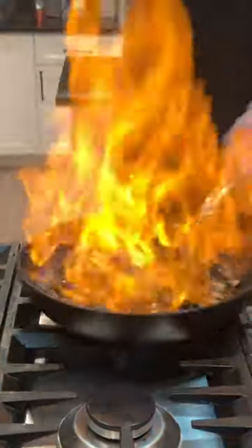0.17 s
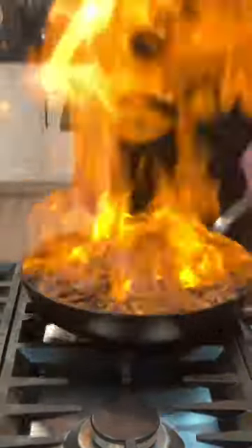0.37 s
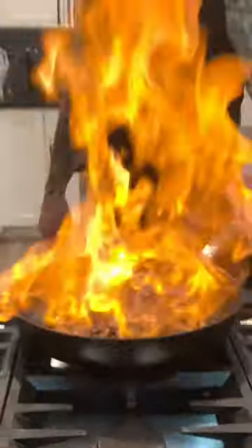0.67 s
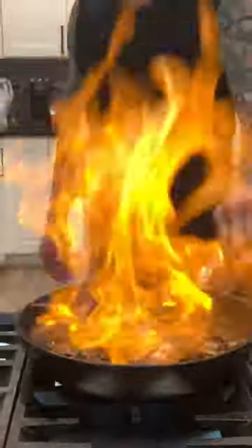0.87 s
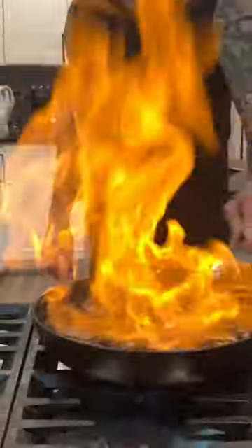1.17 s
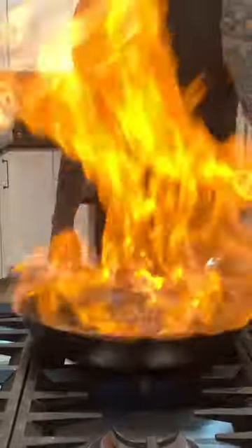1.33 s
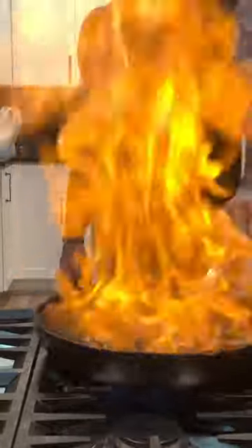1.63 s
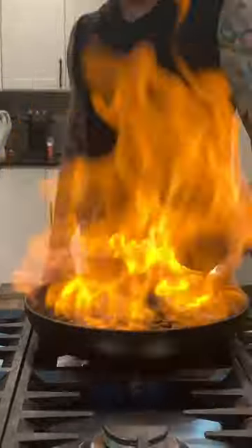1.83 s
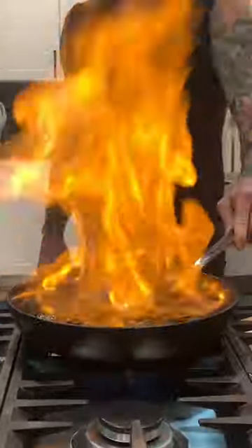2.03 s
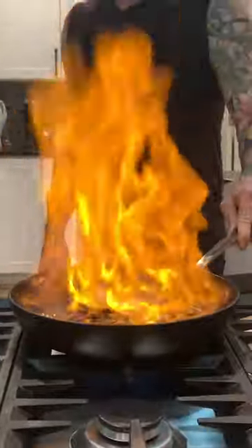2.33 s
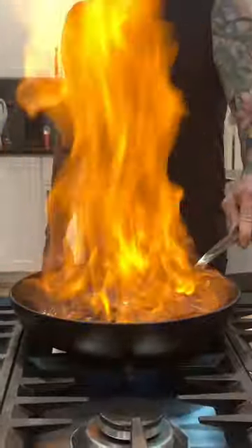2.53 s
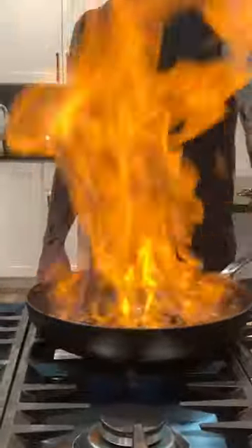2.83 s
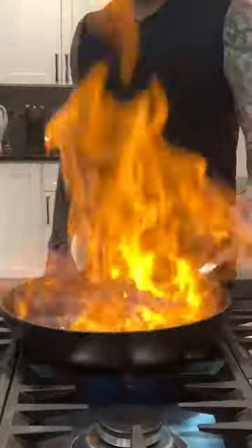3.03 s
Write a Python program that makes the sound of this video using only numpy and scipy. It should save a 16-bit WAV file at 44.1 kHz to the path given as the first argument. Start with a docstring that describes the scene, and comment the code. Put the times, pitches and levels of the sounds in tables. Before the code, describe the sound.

Fat hissing and spitting in a shaken pan, with metal knocks and a soft flame roar.

```python
"""Fat hisses, fizzes and spits in a steel pan, over the soft roar of gas flames and an appliance's hum.
Bursting bubbles are brief damped oscillations; steam and flame are broadband noise. The shaken pan
drags, knocks and scrapes on the iron grate: friction and impact excite the same normal modes, and its
weight sets the stove top booming. The sound is close, with a short diffuse tail that gives it width."""
import sys
import numpy as np
from scipy import signal
from scipy.fft import rfft, irfft, next_fast_len
from scipy.io import wavfile
from scipy.ndimage import uniform_filter1d, map_coordinates

SR = 44100
rng = np.random.default_rng(int(sys.argv[2]) if len(sys.argv) > 2 else 0)


def log_audio(samples):
    """Write samples as a 16-bit WAV file to the path given in sys.argv[1]."""
    # one column per channel
    frames = np.atleast_2d(samples).T
    # limit to full scale, then quantise
    limited = np.clip(frames, -1, 1)
    pcm = np.round(limited * 32767).astype(np.int16)
    wavfile.write(sys.argv[1], SR, pcm)


N = 141120


def amp(db):
    """Decibels to amplitude ratio."""
    return 10 ** (np.asarray(db) / 20)

def unit(x):
    """Normalisation to rms 1."""
    return x / np.sqrt(np.mean(x ** 2) + 1e-20)

def along(points, hz):
    """Interpolation of (Hz, value) points on a log frequency axis."""
    f, v = np.transpose(points)
    return np.interp(np.log(hz + 1), np.log(f + 1), v)

def curve(rows):
    """Linear interpolation of (seconds, value) rows at every sample."""
    s, v = np.transpose(rows)
    return np.interp(np.arange(N) / SR, s, v)

def wobble(rate):
    """Random modulation: a spline through `rate` knots a second."""
    knots = rng.standard_normal(int(N / SR * 100) + 4)
    return map_coordinates(knots, [np.arange(N) * min(rate, 100) / SR])

def filtered(x, response):
    """Linear filtering: the spectrum times a complex frequency response."""
    m = next_fast_len(x.shape[-1] + 8192)
    return irfft(rfft(x, m) * response(np.fft.rfftfreq(m, 1 / SR)), m)[..., :x.shape[-1]]

def treble(x, corner_hz=3300):
    """A gentle second-order high-pass."""
    return filtered(x, lambda hz: (1j * hz / (corner_hz + 1j * hz)) ** 2)

def rush(spectrum, patchy_db):
    """Coloured noise of rms 1, modulated in random patches of time and frequency."""
    cells = signal.stft(rng.standard_normal(N), nperseg=512)[2]
    patches = uniform_filter1d(rng.standard_normal(cells.shape), size=8, axis=0)
    patches = uniform_filter1d(patches, size=6, axis=1)
    noise = signal.istft(cells * amp(patchy_db * unit(patches)), nperseg=512)[1][:N]
    return unit(filtered(noise, lambda hz: amp(along(spectrum, hz))))

def decays(starts, db, t60, samples):
    """Exponential decay: an envelope that jumps at each start and falls 60 dB in t60 seconds."""
    impulses = np.bincount((starts * SR).astype(int), amp(db), N)
    return np.convolve(impulses, amp(-60 * np.arange(samples) / SR / t60))[:N]

def bursts(starts, gain, hz, decay_cycles):
    """Damped oscillation: each bursting bubble is a sine that dies in a few cycles."""
    k = np.arange(48)
    turns = np.clip(hz, 1500, SR / 3)[:, None] * k / SR
    pulses = gain[:, None] * np.sin(2 * np.pi * turns) * np.exp(-turns / decay_cycles)
    index = (starts * SR).astype(int)[:, None] + k
    return np.bincount(index.ravel(), pulses.ravel(), N + 48)[:N]

def fizz(per_second=2200, spread_db=7, centre_hz=10500):
    """A Poisson process: tiny bubbles burst independently, their level swelling in clumps."""
    gap, size, polarity = rng.random((12000, 3)).T
    starts = np.cumsum(-np.log(1 - gap)) / per_second
    gain = amp(-spread_db * np.log(1.03 - size)) * np.sign(polarity - .5)
    hz = centre_hz * 2 ** (.4 * rng.standard_normal(len(starts)))
    heard = starts < N / SR
    bubbles = bursts(starts[heard], gain[heard], hz[heard], decay_cycles=1.1)
    return amp(-0.6 + 2 * wobble(45)) * unit(treble(bubbles))

# Each row: time in seconds, frying strength in dB.
FRYING_STRENGTH = [(0, -35.5), (.33, -36), (.52, -32.5), (.68, -33), (.74, -34.5), (.82, -31.5), (.95, -31),
                   (1.07, -33), (1.21, -27.5), (1.35, -30), (1.46, -34.5), (1.58, -28.5), (1.72, -30.5),
                   (1.82, -34), (1.92, -30), (2.1, -33), (2.35, -33), (2.53, -37), (2.7, -36.5),
                   (2.87, -38.5), (3.0, -33.5), (3.2, -36)]
# Each row of both spectra: frequency in Hz, relative spectral density in dB.
SIMMER_SPECTRUM = [(200, -22), (400, 1), (900, -5), (2000, -2), (3500, 2), (5000, -11), (8000, -13.5)]
HISS_SPECTRUM = [(2500, -37), (4000, -2.5), (5000, -2.5), (6500, 1), (10000, -1), (13000, 2.5), (15500, -9)]
def sizzle(simmer_follows=0.46):
    """Amplitude modulation: steam hiss and fizz follow the frying strength, a duller simmer only partly."""
    slow_db = curve(FRYING_STRENGTH)
    mean_db = slow_db.mean()
    strength_db = slow_db + 0.52 * wobble(9.45) + 0.14 * wobble(27.7)
    bubbles = fizz()
    simmer_db = mean_db - 3 + simmer_follows * (strength_db - mean_db)
    simmer = amp(simmer_db) * rush(SIMMER_SPECTRUM, patchy_db=3.5)
    steam = amp(4.5) * rush(HISS_SPECTRUM, patchy_db=2)
    return simmer + amp(strength_db) * (steam + bubbles)

# Each row: time in seconds, level of the roar in dB.
FLAME_LEVEL = [(0, -37), (.5, -36.5), (.95, -36), (1.4, -34), (1.75, -36), (2.1, -39), (2.8, -39),
               (3.2, -34)]
# Each row: frequency in Hz, relative spectral density in dB.
FLAME_SPECTRUM = [(20, -36), (35, -9), (58, 1.5), (75, -6.5), (95, 4), (110, -8), (145, -1), (210, -3),
                  (300, -7.5), (500, -14.5), (900, -17.5), (2000, -23)]
def flames():
    """Combustion noise: a low broadband roar that slowly swells and sinks."""
    return amp(curve(FLAME_LEVEL)) * rush(FLAME_SPECTRUM, patchy_db=0)

def hum(hz=120, rms_db=-47):
    """Forced vibration: the mains drives an appliance at one frequency, its level wavering."""
    return amp(rms_db + 1.6 * wobble(3.8)) * np.sqrt(2) * np.sin(2 * np.pi * hz * np.arange(N) / SR)

# Modes of pan and grate. Each row: frequency in Hz, relative level in dB, 60 dB decay time in seconds.
PAN_MODES = [(520.5, 3, 0.17), (558, 5.5, 0.14), (583.3, 15, 0.1), (680, 1.5, 0.23), (1008, -6.5, 0.084),
             (1099, 3.5, 0.16), (1192, 0.5, 0.053), (1236, 1, 0.12), (1315, 2.5, 0.09), (1387, 3.5, 0.052),
             (1520, -1.5, 0.01), (1738, -3, 0.09), (1804, -3, 0.12), (2083, -4.5, 0.028)]
# Each row: time in seconds, level of the rubbing in dB.
DRAG_LEVEL = [(0, -35), (.2, -42.5), (.4, -37.5), (.75, -46), (.9, -36), (.962, -41), (.99, -33),
              (1.15, -37), (1.4, -42), (1.55, -35), (1.8, -37.5), (2, -44), (2.4, -50.5), (2.8, -50.5),
              (2.985, -44), (3.01, -33), (3.2, -40.5)]
def drag(damping_factor=2.3):
    """Frictional excitation: uneven rubbing drives the modes and damps them, widening each resonance."""
    def resonances(f):
        response = 0
        for k, (hz, db, t60) in enumerate(PAN_MODES):
            width_hz = damping_factor * np.log(1000) / np.pi / t60
            loss = 1j * f * width_hz
            response += (-1) ** k * amp(db) * loss / (hz * hz - f * f + loss)
        return response
    friction = amp(3.95 * wobble(24.68)) * rng.standard_normal(N)
    return amp(curve(DRAG_LEVEL)) * unit(filtered(friction, resonances))

# Each row: start in seconds, burst size in dB.
FAT_SPITS = [(0.0322, -8), (0.037, -7), (0.1489, -2), (0.161, -8), (0.1742, -7), (0.2151, -3), (0.226, -5),
             (0.274, -8), (0.5078, -8), (0.5427, 0), (0.5962, -8), (0.6273, -7), (0.6969, -7), (0.8534, -7),
             (0.8762, -2), (0.9747, -7), (1.2279, -5), (1.2811, -5), (1.3185, -2), (1.3698, -6),
             (1.6643, -2), (1.69, -6), (2.0326, -5), (2.0383, -9), (2.104, -5), (2.1377, -5), (2.1918, -5),
             (2.201, 1), (2.2692, -9), (2.2749, -4), (2.2891, -8), (2.3374, -6), (2.3874, -4), (2.4283, -8),
             (2.5529, -8), (2.6417, -11), (2.6662, -7), (2.7494, -9), (2.985, -9)]
def spits(crack_hz=9500):
    """Impulsive sources: each spit of fat is a damped crack with a short spray of noise."""
    starts, db = np.transpose(FAT_SPITS)
    hz = crack_hz * 2 ** (0.07 * rng.standard_normal(len(starts)))
    cracks = treble(bursts(starts, amp(db), hz, decay_cycles=1.8))
    spray = decays(starts, db - 17, t60=0.01, samples=1500) * rush(HISS_SPECTRUM, patchy_db=2)
    return cracks + spray

# Each row: frequency in Hz, relative spectral density in dB.
CLATTER_SPECTRUM = [(850, -20), (1200, 6.5), (2200, 1), (3000, -2), (4500, 3), (8000, -8), (12000, -46)]
# Each row: start in seconds, upper ring's strength in dB, its centre in Hz, lower ring's strength in dB,
# its centre in Hz, clatter in dB, upper ring's decay time as a multiple of the free one.
GRATE_BLOWS = [(0.038, -22, 1670, -39, 590, -23.5, 0.34), (0.0505, -19.5, 1370, -17, 606, -30, 0.84),
               (.316, -17, 1583, -18, 534, -22, 0.74), (0.345, -32, 1030, -36, 580, -73, 1.9),
               (0.7706, -34, 1770, -23.5, 580, -37, 2.3), (0.7902, -25.5, 1260, -13, 620, -26, 1.2),
               (0.9164, -35, 1750, -20.5, 560, -30.5, 0.85), (.968, -14.5, 1385, -9, 570, -18.5, 1.17),
               (.988, -34, 1390, -26, 586, -24.5, 1), (1.502, -25, 1070, -13, 586, -22, 0.97),
               (1.7524, -15.5, 1460, -21, 680, -27.5, 0.81), (2.9915, -19.5, 1220, -11, 570, -21, 0.66),
               (3.0025, -24.5, 1750, -13.5, 540, -20.5, 1.9), (3.045, -28, 1090, -17.5, 600, -30.5, 0.85),
               (3.0833, -32, 1490, -21.5, 534, -30.5, 0.89)]
def knocks(split_hz=900, upper_octaves=0.14, lower_octaves=0.11):
    """Impact excitation: a blow rings the modes near two centres, the high at once, the low just after."""
    out, t = np.zeros(N + SR), np.arange(SR // 4) / SR
    hz, mode_db, t60 = np.transpose(PAN_MODES)[..., None]
    upper = hz > split_hz
    rise = 1 - np.exp(-t / np.where(upper, .0006, .008))
    bite_db = upper * 6 * np.exp(-t / 0.004)  # the upper ring starts stronger, then settles
    clatter_rise = 1 - np.exp(-t / .0008)
    chance = rng.standard_normal((len(GRATE_BLOWS), 2, len(PAN_MODES), 1))
    white = rng.standard_normal((len(GRATE_BLOWS), len(t)))
    noises = filtered(white, lambda f: amp(along(CLATTER_SPECTRUM, f)))
    for blow, (scatter, phase), noise in zip(GRATE_BLOWS, chance, noises):
        start, up_db, up_hz, low_db, low_hz, clatter_db, stretch = blow
        distance = np.where(upper, np.log2(hz / up_hz) / upper_octaves,
                            np.log2(hz / low_hz) / lower_octaves)
        gain = amp(mode_db + 1.5 * scatter) * np.exp(-distance ** 2 / 2)
        gain *= np.where(upper, amp(up_db) / np.linalg.norm(gain * upper),
                         amp(low_db) / np.linalg.norm(gain * ~upper))
        decay = amp(bite_db - 60 * t / (t60 * np.where(upper, stretch, 1)))
        ring = gain * rise * decay * np.sin(2 * np.pi * (hz * t + phase * ~upper))
        clatter = amp(clatter_db - 60 * t / 0.1) * clatter_rise * unit(noise)
        out[round(start * SR):][:len(t)] += ring.sum(0) + clatter
    rattle_db = 1.5 * wobble(100)  # loose contact makes the ring uneven
    return amp(rattle_db) * out[:N]

# Each row: start in seconds, initial level in dB.
RIM_SCRAPES = [(.3158, -23), (.968, -23), (2.9915, -15), (3.002, -20)]
def scrapes(top_hz=9500):
    """Friction noise: the rim grinds briefly and brightly on the iron at some hard blows."""
    starts, db = np.transpose(RIM_SCRAPES)
    grind = filtered(treble(rng.standard_normal(N)), lambda hz: 1 / (1 + (hz / top_hz) ** 10))
    return decays(starts, db, t60=.028, samples=4000) * unit(grind)

# Each row: frequency in Hz, relative level in dB, 60 dB decay time in seconds.
STOVE_MODES = [(61, 0, 0.14), (143, 4.5, 0.26), (214, -5.5, 0.37), (252, 1.5, 0.15)]
# Each row: start in seconds, strength in dB.
PAN_LANDINGS = [(0.798, -33.5), (0.928, -36), (1.349, -30.5), (1.681, -25.5), (1.778, -27)]
def thuds(rise_s=0.018):
    """Free vibration: the stove top booms in its low modes as the pan's weight lands softly."""
    out, t = np.zeros(N + SR), np.arange(SR // 2) / SR
    hz, mode_db, t60 = np.transpose(STOVE_MODES)[..., None]
    chance = rng.standard_normal((len(PAN_LANDINGS), 2, len(STOVE_MODES), 1))
    for (start, db), (scatter, phase) in zip(PAN_LANDINGS, chance):
        ring = amp(db + mode_db + 0.34 * scatter - 60 * t / t60) * np.sin(2 * np.pi * (hz * t + phase))
        out[round(start * SR):][:len(t)] += ring.sum(0) * (1 - np.exp(-t / rise_s))
    return out[:N]

# Each row: frequency in Hz, share of the amplitude that differs between left and right.
DIFFUSE_SHARE = [(60, 0.066), (700, 0.24), (1000, 0.79), (2000, 0.6), (3000, 0.43), (5000, 0.17),
                 (16000, 0.27)]
def diffusion(x, t60=0.053, delay_s=.001):
    """Decorrelation: a short diffuse tail, different left and right, is heard as stereo width."""
    hop, t = 2048, np.arange(4096) / SR
    window = np.sqrt(np.hanning(2 * hop + 1)[:-1])
    diffuse = np.zeros((2, N + 8 * hop))
    padded = np.pad(x, (hop, 2 * hop))
    for i in range(0, N + hop, hop):  # a new tail every block, so it adds no constant colour
        tail = rng.standard_normal((2, len(t))) * amp(-60 * t / t60) * (t > delay_s)
        tail /= np.linalg.norm(tail, axis=1, keepdims=True)
        block = signal.fftconvolve((window * padded[i:i + 2 * hop])[None], tail, axes=1)
        diffuse[:, i:i + block.shape[1]] += block
    share = lambda hz: np.clip(along(DIFFUSE_SHARE, hz), 0, 1)
    direct = filtered(x, lambda hz: np.sqrt(1 - share(hz) ** 2))
    return direct + filtered(diffuse[:, hop:hop + N], share)

def scene():
    """Superposition: all sources add and share one diffusion."""
    return diffusion(sizzle() + spits() + hum() + flames() + thuds() + knocks() + scrapes() + drag())

# Each row: frequency in Hz, phase lead of the left channel in radians.
LEFT_LEAD = [(0, 0), (300, -1.2), (620, -2.7), (950, -3.9), (1400, -5.1), (2200, -5.2), (2900, -3.4),
             (4000, -4.4), (4800, -3.2), (5500, -3), (7800, -.1), (9000, .1), (11700, 3), (13500, 3.3),
             (15100, 6.2), (16000, 6.3)]
# Each row: frequency in Hz, left minus right level in dB.
LEFT_EXCESS = [(100, -1), (300, 0), (1200, 0.5), (2300, -4), (3300, -2), (6000, 0)]
def record(dry, top_hz=15800):
    """Phase and level differences between the channels give the stereo image, cut off at top_hz."""
    side = np.array([[1], [-1]]) / 2
    lead_hz, lead = np.transpose(LEFT_LEAD)
    def channels(hz):
        gain = amp(side * along(LEFT_EXCESS, hz)) * (hz < top_hz)
        return gain * np.exp(1j * side * np.interp(hz, lead_hz, lead))
    return filtered(dry, channels)


dry = scene()
out = record(dry)
log_audio(out)
```